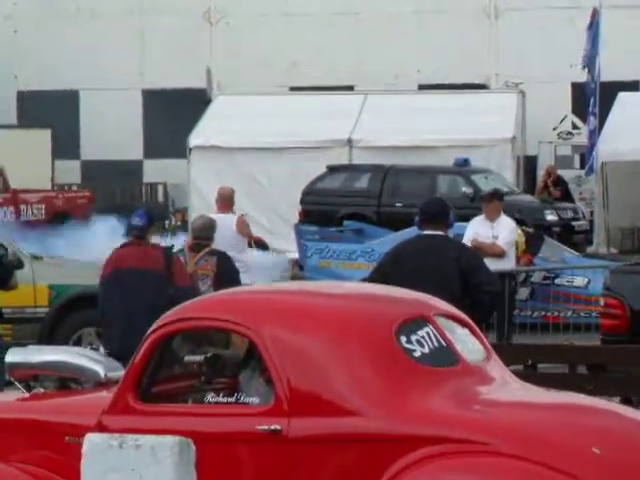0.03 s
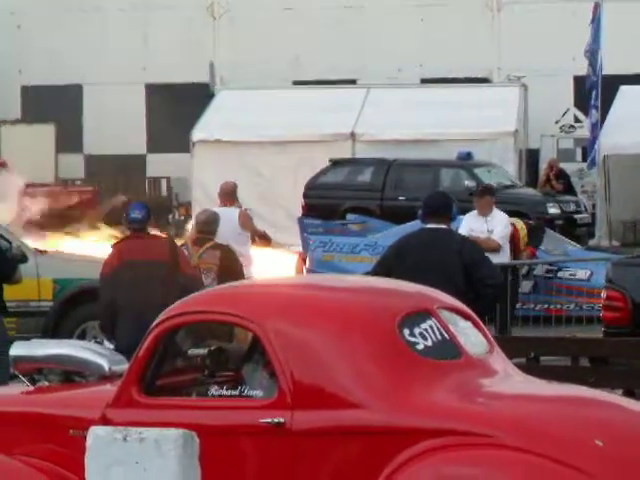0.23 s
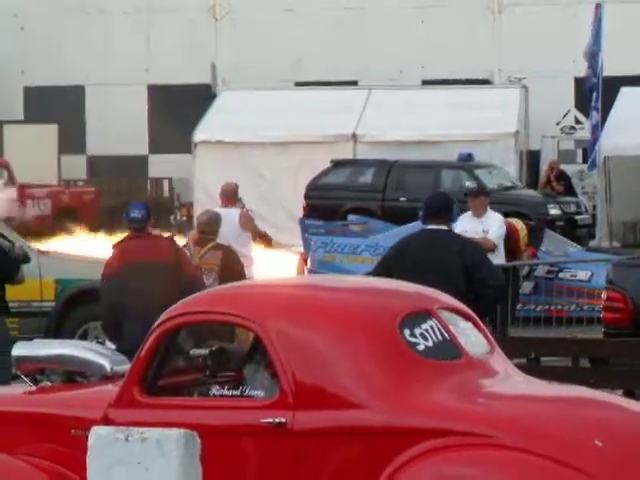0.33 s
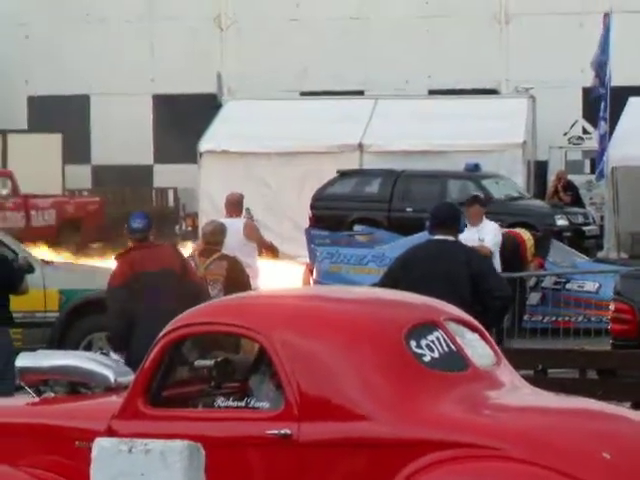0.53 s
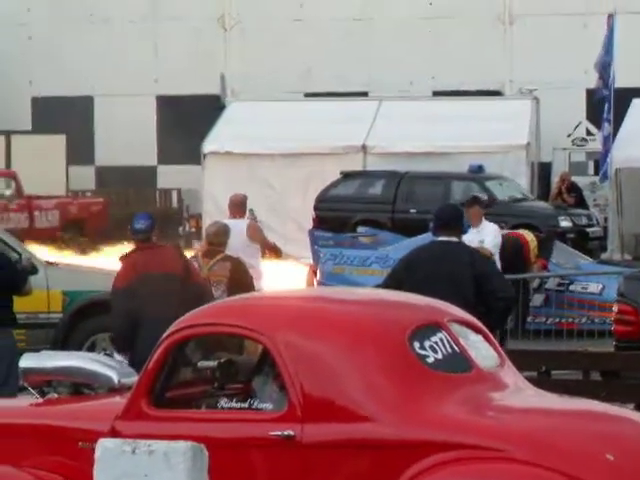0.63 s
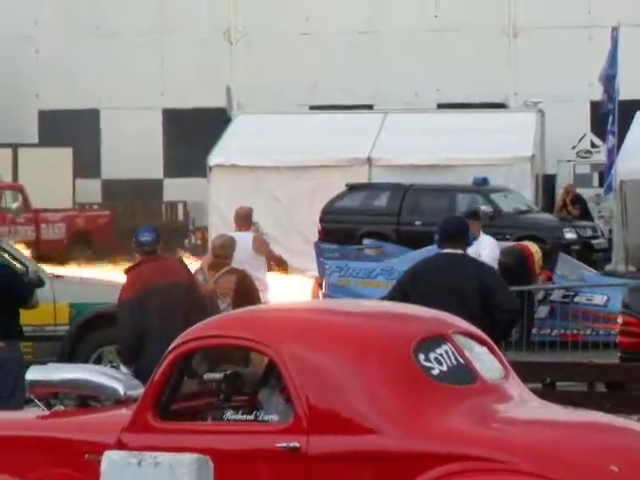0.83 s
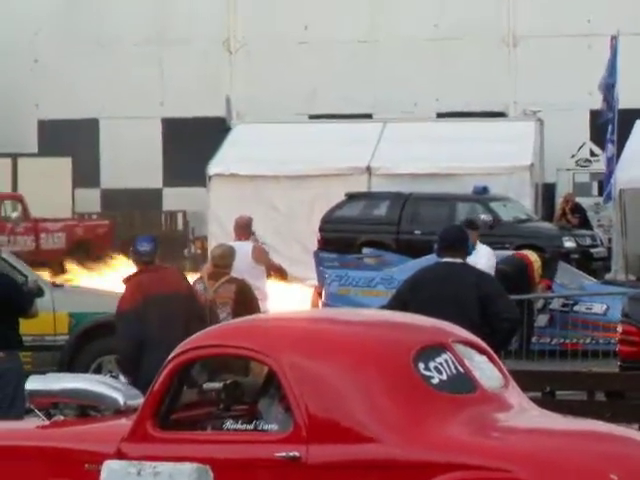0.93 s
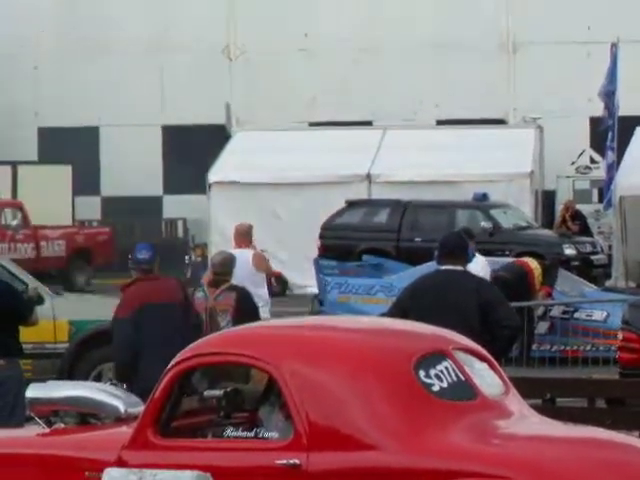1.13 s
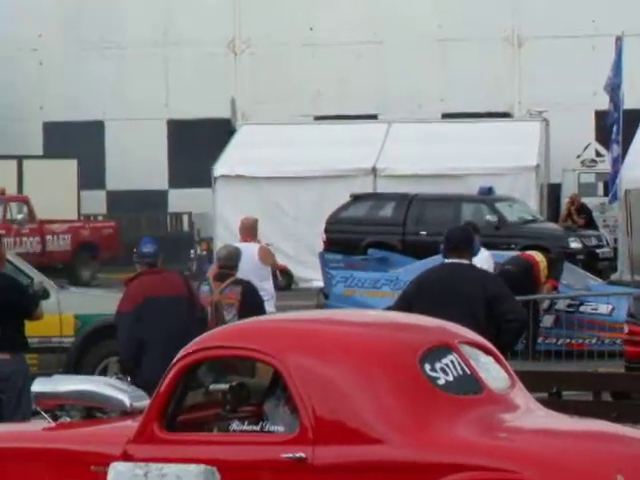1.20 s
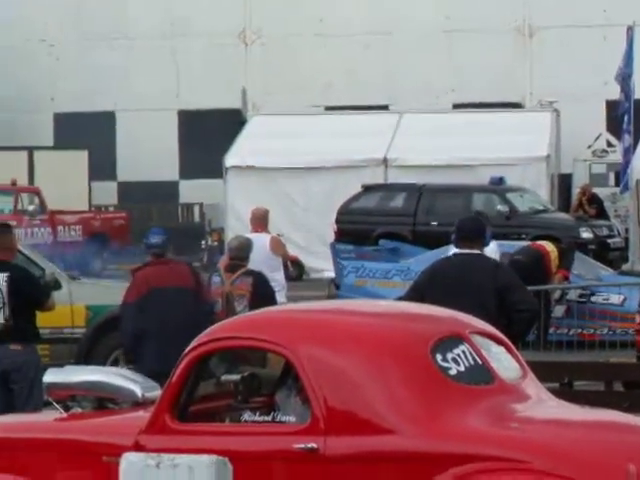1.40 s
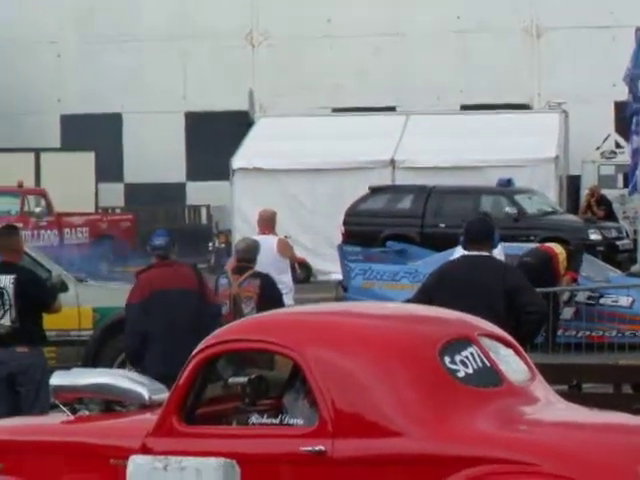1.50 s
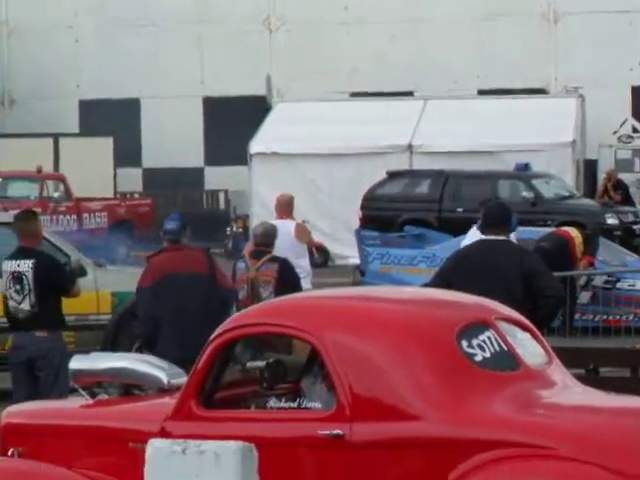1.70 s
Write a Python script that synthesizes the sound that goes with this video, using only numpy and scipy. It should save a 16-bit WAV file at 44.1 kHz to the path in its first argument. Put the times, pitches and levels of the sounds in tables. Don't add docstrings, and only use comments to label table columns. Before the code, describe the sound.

Jet engine at an open-air racing event: brief idling hiss with fluttering high whine, a sudden deep distorted bang and echo, then turbulent flame roar growing brighter before cutting out, leaving turbine hiss and whine.

```python
import sys
import numpy as np
from scipy import signal
from scipy.fft import rfft, irfft, next_fast_len
from scipy.io import wavfile
from scipy.ndimage import uniform_filter1d, map_coordinates

SR = 44100
rng = np.random.default_rng(int(sys.argv[2]) if len(sys.argv) > 2 else 0)


def nominal_scale(level):
    x = np.asarray(level, float) / 20
    return 10 ** x


def wav_record(signal):
    frames = np.transpose(np.atleast_2d(signal))
    bounded = np.clip(frames, -1, 1)
    quanta = np.round(bounded * 32767).astype(np.int16)
    wavfile.write(sys.argv[1], SR, quanta)


N = 77175
TIME_S = np.arange(N) / SR
BURST_S = np.arange(SR // 4) / SR


def unit(x):
    return x / np.sqrt(np.mean(x ** 2) + 1e-20)


def along(points, hz):
    f, v = np.transpose(points)
    return np.interp(np.log(hz + 1), np.log(f + 1), v)


def curves(rows):
    s, *columns = np.transpose(rows)
    return [np.interp(TIME_S, s, column) for column in columns]


def wobble(rate):
    return map_coordinates(rng.standard_normal(N // 50), [TIME_S * rate])


def filtered(x, response):
    m = next_fast_len(len(x) + 8192)
    return irfft(rfft(x, m) * response(np.fft.rfftfreq(m, 1 / SR)), m)[:len(x)]


def rush(spectrum, patchy_db):
    z = signal.stft(rng.standard_normal(N + 512), nperseg=512)[2]
    eddies = uniform_filter1d(rng.standard_normal(z.shape), size=6, axis=0)
    eddies = uniform_filter1d(eddies, size=8, axis=1)
    x = signal.istft(z * nominal_scale(patchy_db * unit(eddies)), nperseg=512)[1][:N]
    return unit(filtered(x, lambda hz: nominal_scale(along(spectrum, hz))))


def intake_hiss():
    # hz, density_db (per Hz)
    hiss_spectrum = [(160, -44), (280, -5.5), (350, -9), (439, -7.5), (1330, -11.5), (1690, -11.5),
                     (4260, -13.5), (6300, -12), (8000, -15.5), (10400, -43), (17600, -120)]
    return nominal_scale(-43.5 + 0.2 * wobble(26)) * rush(hiss_spectrum, patchy_db=1.15)


def exhaust_rumble():
    # hz, density_db (per Hz)
    rumble_spectrum = [(8.8, -58.5), (15, -10.5), (32, -4.5), (70, -2.5), (102, -8), (171, -9.5),
                       (203, -12), (300, -15), (390, -35.5), (660, -120)]
    fade_db_per_s = -6
    level_db = -31.5 + fade_db_per_s * TIME_S + 0.52 * wobble(42)
    return nominal_scale(level_db) * rush(rumble_spectrum, patchy_db=2.7)


def duct_howl():
    center_hz, width_hz = 1670, 260
    howl = filtered(rng.standard_normal(N), lambda hz: np.exp(-.5 * ((hz - center_hz) / width_hz) ** 2))
    return nominal_scale(-59.5) * unit(howl)


def blade_whine():
    # time_s, blade_hz
    spool = [(0, 3172), (.23, 3192), (.5, 3130), (.66, 3106), (.86, 3086), (1.1, 3070), (1.28, 3068),
             (1.42, 3102), (1.6, 3138), (1.75, 3166)]
    # time_s, blade_db, octave_db
    fading = [(0, -53.5, -51), (.13, -67.5, -50.5), (.23, -53, -52), (.3, -66, -62.5), (.46, -73, -67),
              (.52, -58, -52), (.66, -59.5, -58.5), (.78, -61, -49), (.86, -59, -69), (.97, -54, -74),
              (1.04, -69, -59), (1.12, -54.5, -57.5), (1.27, -52, -56), (1.33, -61.5, -56),
              (1.42, -62.5, -53.5), (1.52, -52, -57), (1.6, -60, -53), (1.75, -65.5, -45)]
    blade_hz, = curves(spool)
    blade_db, octave_db = curves(fading)
    phase = 2 * np.pi * np.cumsum(blade_hz + 5 * wobble(50)) / SR
    blade = nominal_scale(blade_db + 5 + 1.56 * wobble(27.83)) * np.sin(phase)
    octave = nominal_scale(octave_db + 4 + 2.6 * wobble(45)) * np.sin(2 * phase)
    return blade + octave


def flame():
    # time_s, strength_db, brightness_db
    burning = [(.225, -80, -12), (.245, -21, -12), (.44, -21, -12), (.54, -25, -4), (.75, -26, -1),
               (1.0, -28, .5), (1.17, -26, .5), (1.37, -31, -3), (1.48, -58, -3)]
    # hz, density_db (per Hz)
    roar_spectrum = [(8.8, -20), (15, -4), (49, -5.5), (140, 0), (400, -15.5), (661, -22), (849, -20.5),
                     (2260, -38.5), (6000, -41), (7800, -76), (13200, -120)]
    split_hz, deep_hz = 270, 80
    strength_db, bright_db = curves(burning)
    lumps_db = 0.7 * wobble(17.57) + 1.33 * wobble(40)
    roar = rush(roar_spectrum, patchy_db=1.0)
    low = filtered(roar, lambda hz: 1 / (1 + (hz / split_hz) ** 2))
    fizz = roar - low
    settled = np.clip((TIME_S - .42) / 0.073, 0, 1)
    deep = filtered(low, lambda hz: 1 / (1 + (hz / deep_hz) ** 4))
    low = low - (1 - nominal_scale(-12 * (0.5 - settled))) * deep
    return nominal_scale(strength_db + lumps_db) * low + nominal_scale(strength_db + bright_db + 0.43 * lumps_db) * fizz


def place(out, start_s, event):
    out[round(start_s * SR):][:len(event)] += event


def ignition_shock(out):
    rise_s, fall_s = .0004, .0008
    place(out, .2282, -nominal_scale(2) * (np.exp(-BURST_S / fall_s) - np.exp(-BURST_S / rise_s)))


def pressure_swings(out):
    # start_s, peak_db, pitch_hz, t60_s, rise_s
    arrivals = [
        (.2215, -7, 66, .07, .002),
        (.2287, 11.5, 50, .12, .0014),
        (.252, 1, 17, .28, .004),
        (.288, -8, 85, .04, .001),
        (.3395, 3, 29, .09, .0007),
        (.369, 8.5, 66, .065, .005),
        (.384, 20, 34, .15, .02),
    ]
    pushes = (False, False, False, True, True, False, False)
    sag = 6
    for (start_s, peak_db, pitch_hz, t60_s, rise_s), push in zip(arrivals, pushes):
        cycles = pitch_hz * (1 - np.exp(-sag * BURST_S)) / sag
        envelope = nominal_scale(peak_db - 60 * BURST_S / t60_s) * (1 - np.exp(-BURST_S / rise_s)) ** 2
        swing = np.sin(2 * np.pi * cycles) * envelope
        place(out, start_s, swing if push else -swing)


def noisy_fronts(out):
    # start_s, peak_db, rise_s, t60_s, center_hz
    fronts = [
        (.2283, -27, .0004, .012, 5600),
        (.318, -24, .015, .1, 570),
    ]
    q = 0.63
    for start_s, peak_db, rise_s, t60_s, center_hz in fronts:
        def band(hz):
            detune = hz / center_hz - center_hz / (hz + 1)
            return 1 / (1 + (q * detune) ** 2)
        puff = unit(filtered(rng.standard_normal(len(BURST_S)), band))
        envelope = nominal_scale(peak_db - 60 * BURST_S / t60_s) * (1 - np.exp(-BURST_S / rise_s))
        place(out, start_s, puff * envelope)


def boom():
    out = np.zeros(N)
    ignition_shock(out)
    pressure_swings(out)
    noisy_fronts(out)
    return out


def off_ground(hz):
    delay_s, strength, dull_hz = .00175, .45, 2500
    return 1 + strength * np.exp(-2j * np.pi * hz * delay_s) / (1 + (hz / dull_hz) ** 2)


def scene():
    turbine = blade_whine() + intake_hiss() + exhaust_rumble() + duct_howl()
    return filtered(turbine + flame() + boom(), off_ground)[None]


def top_cut(x):
    return signal.sosfilt(signal.butter(12, 8990, fs=SR, output="sos"), x)


def record(dry):
    # time_s, gain_db
    gain_control = [(0, -1), (.229, 0), (.232, -5), (.244, -11), (.29, -7), (.34, -4.5), (.356, -9),
                    (.41, -10), (.46, -10), (.5, -4), (.58, 0), (.8, 3), (1.1, 5), (1.3, 4), (1.5, 6),
                    (1.75, 9)]
    top_hz, order, clip = 7910, 15.4, .705
    gain_db, = curves(gain_control)
    x = filtered(dry[0], lambda hz: 1 / np.sqrt(1 + (hz / top_hz) ** (2 * order)))
    x = x * nominal_scale(gain_db)
    return top_cut(np.clip(x, -clip, clip)[None])


dry = scene()
out = record(dry)
wav_record(out)
```